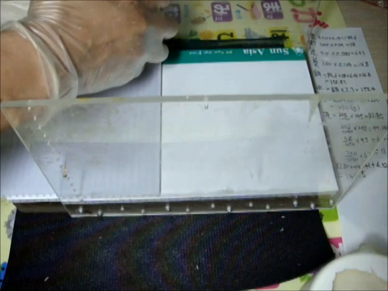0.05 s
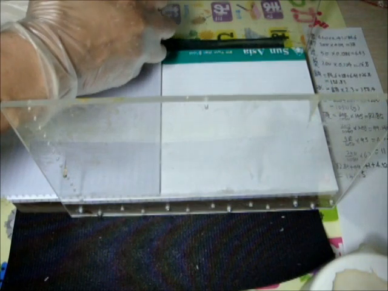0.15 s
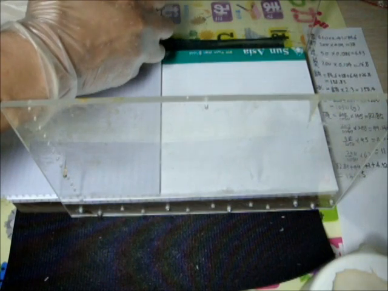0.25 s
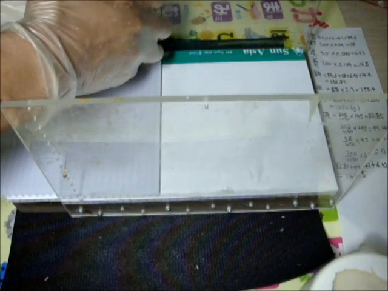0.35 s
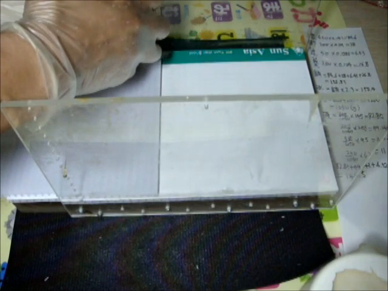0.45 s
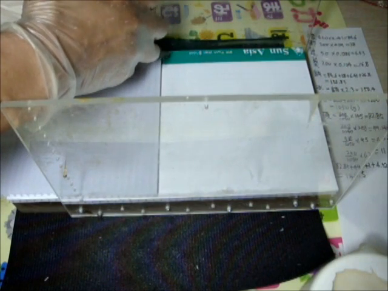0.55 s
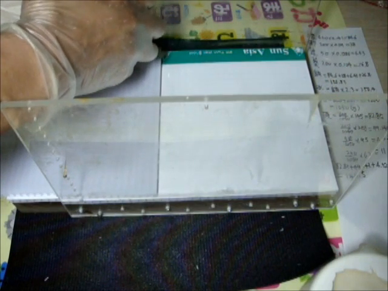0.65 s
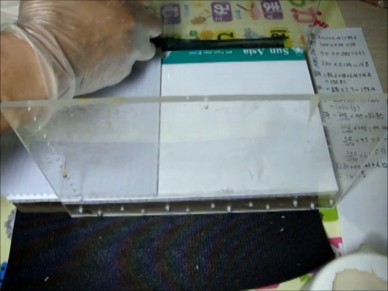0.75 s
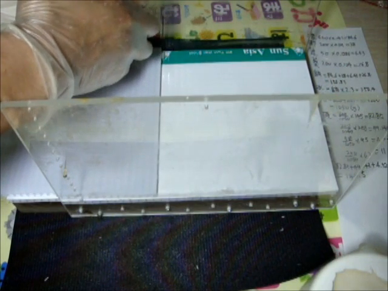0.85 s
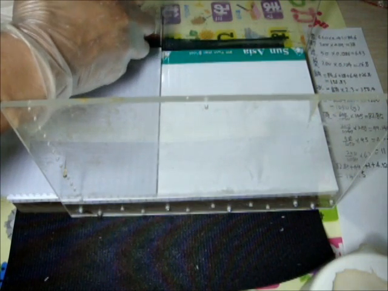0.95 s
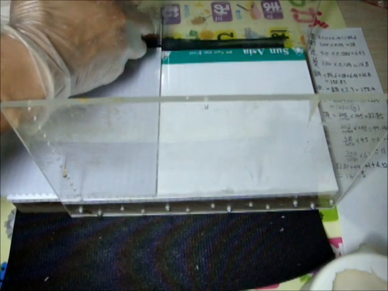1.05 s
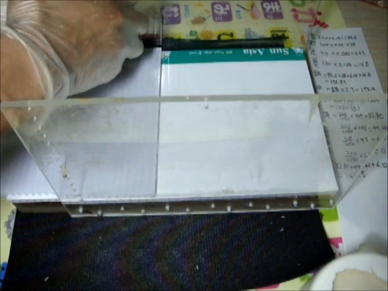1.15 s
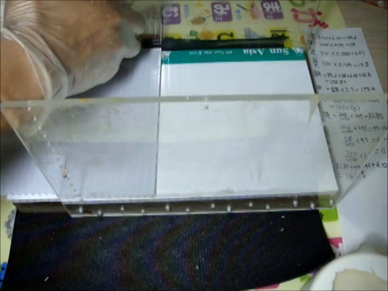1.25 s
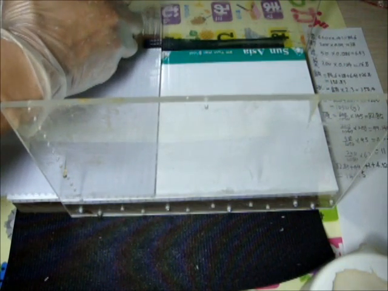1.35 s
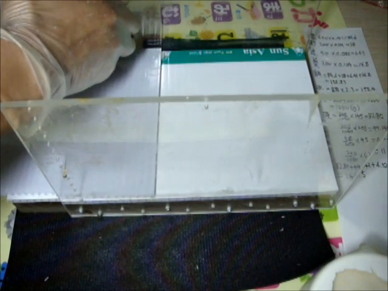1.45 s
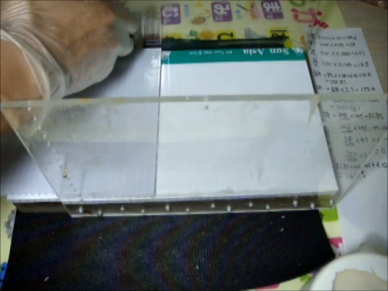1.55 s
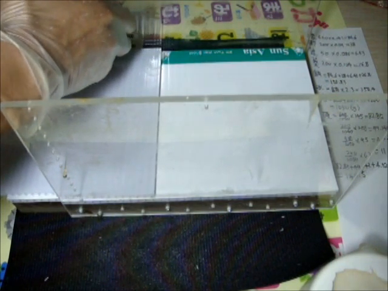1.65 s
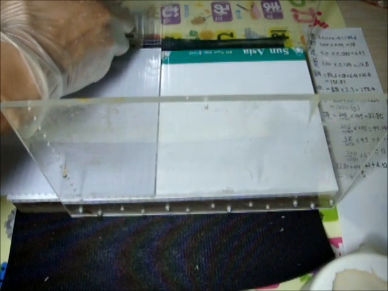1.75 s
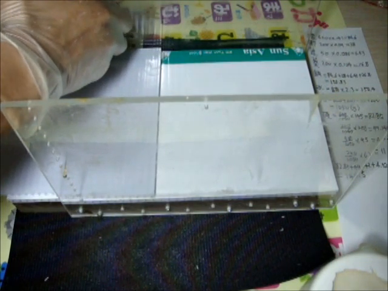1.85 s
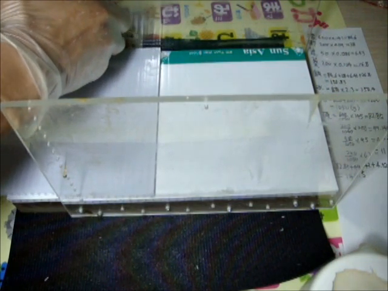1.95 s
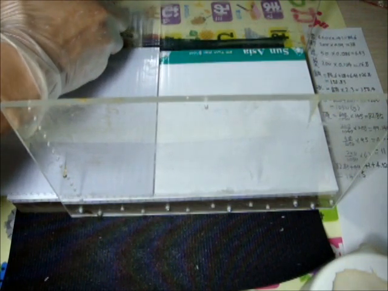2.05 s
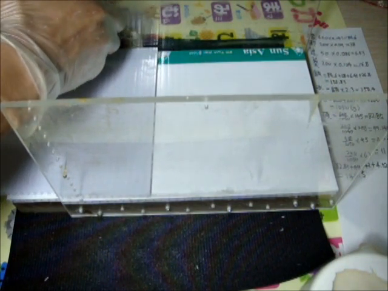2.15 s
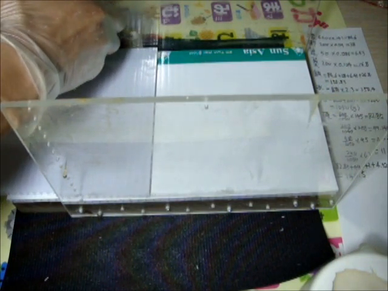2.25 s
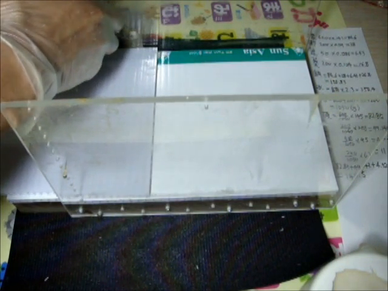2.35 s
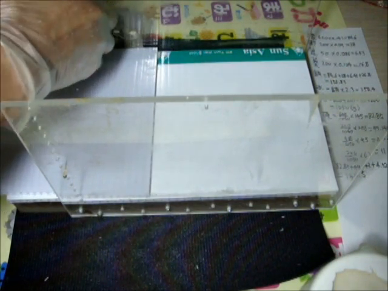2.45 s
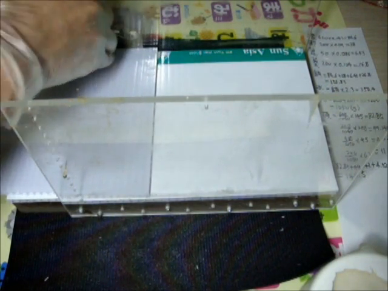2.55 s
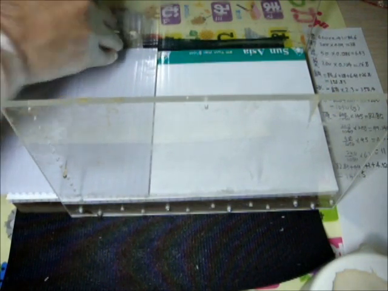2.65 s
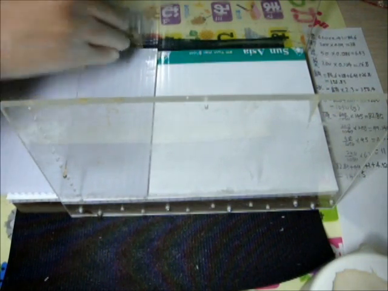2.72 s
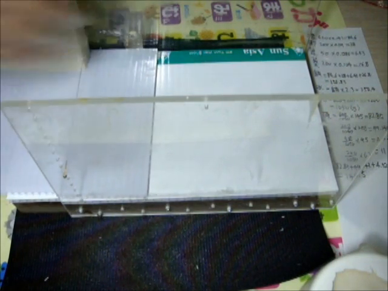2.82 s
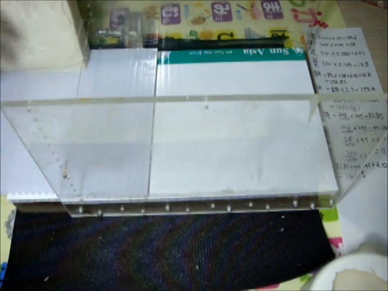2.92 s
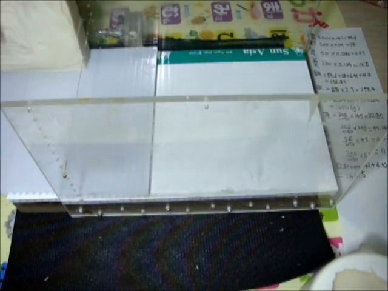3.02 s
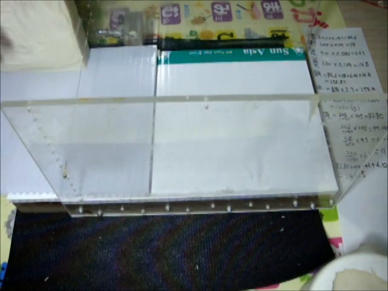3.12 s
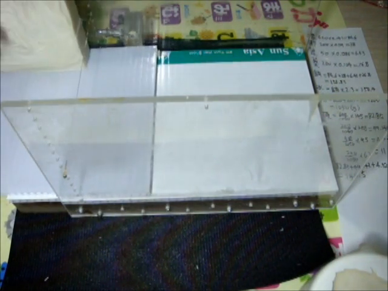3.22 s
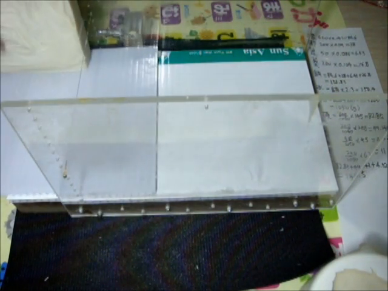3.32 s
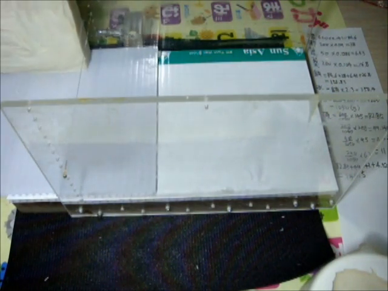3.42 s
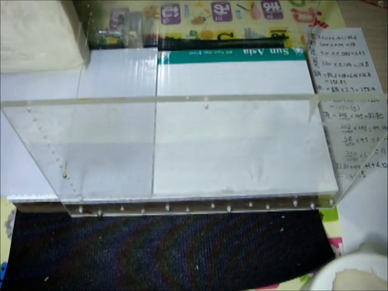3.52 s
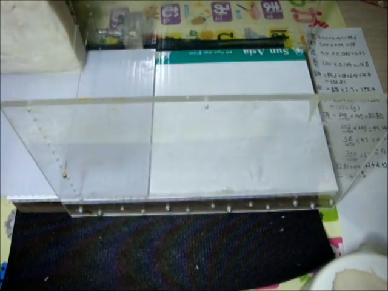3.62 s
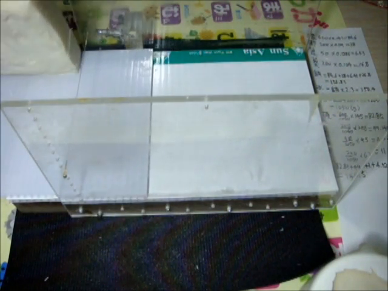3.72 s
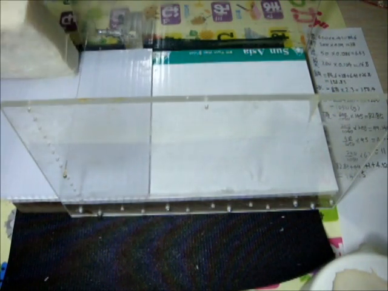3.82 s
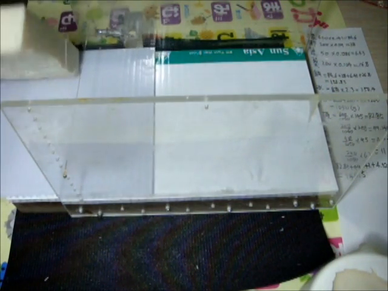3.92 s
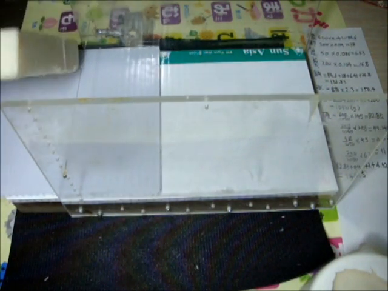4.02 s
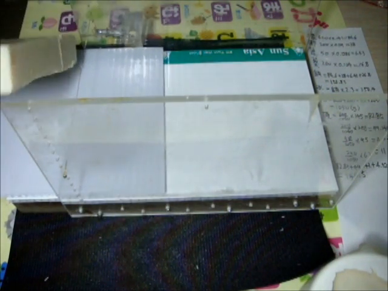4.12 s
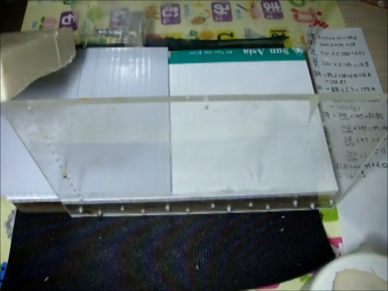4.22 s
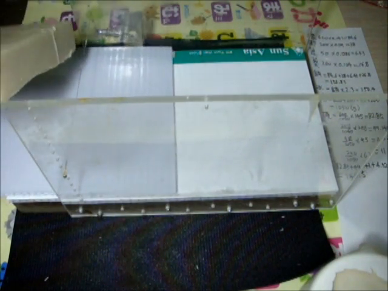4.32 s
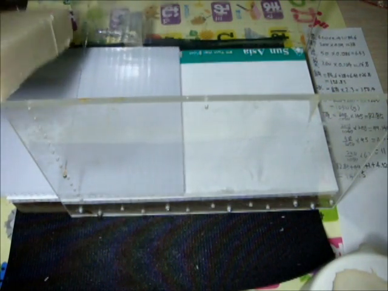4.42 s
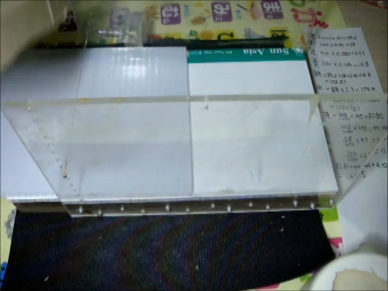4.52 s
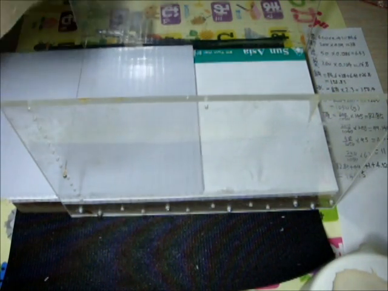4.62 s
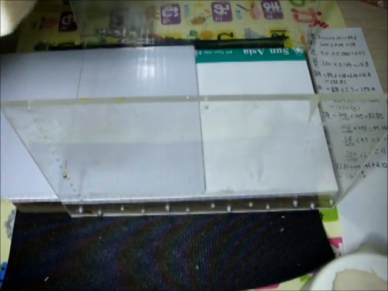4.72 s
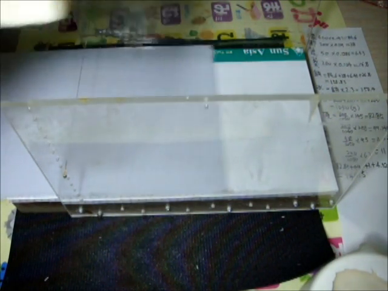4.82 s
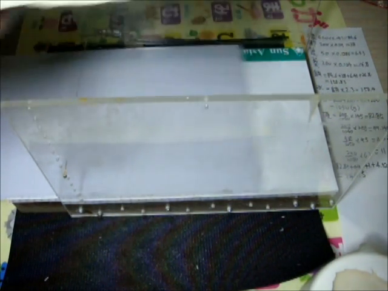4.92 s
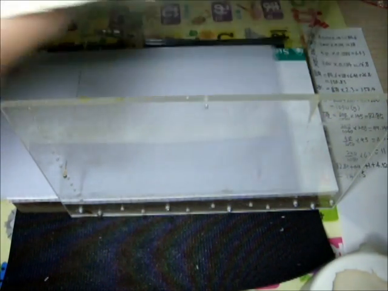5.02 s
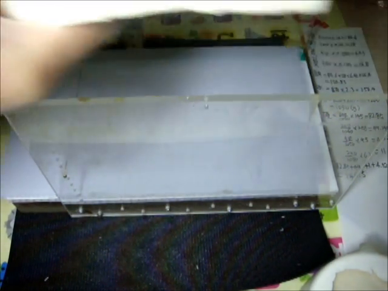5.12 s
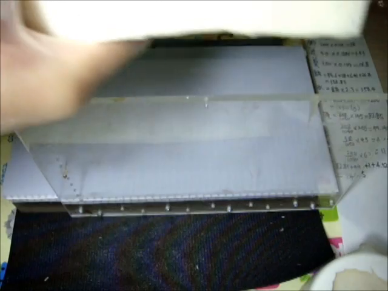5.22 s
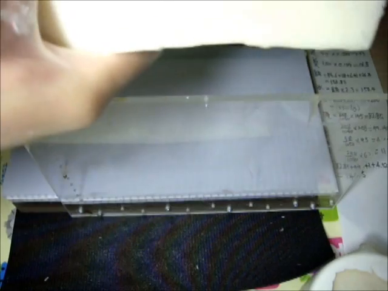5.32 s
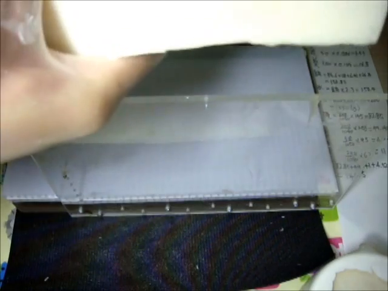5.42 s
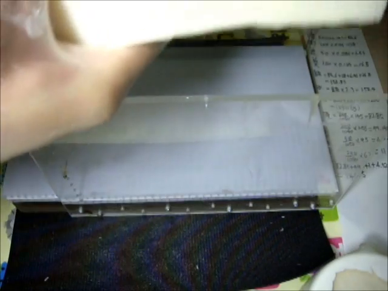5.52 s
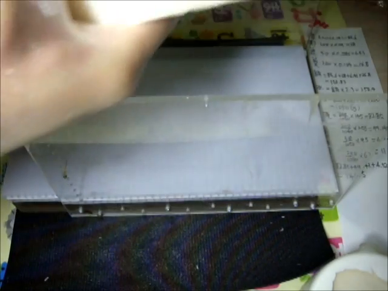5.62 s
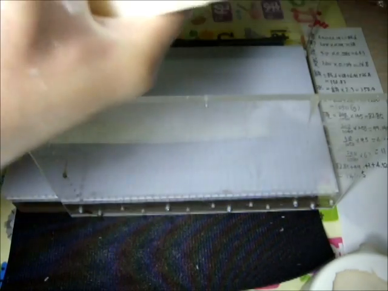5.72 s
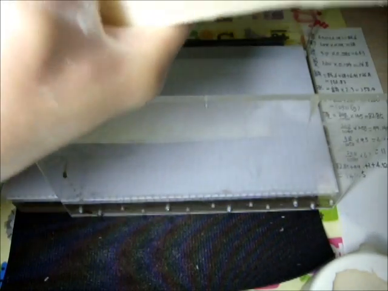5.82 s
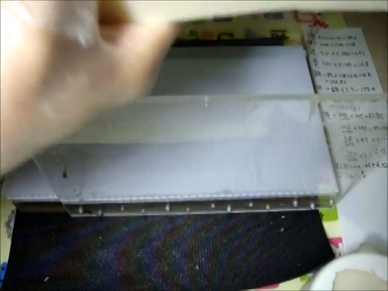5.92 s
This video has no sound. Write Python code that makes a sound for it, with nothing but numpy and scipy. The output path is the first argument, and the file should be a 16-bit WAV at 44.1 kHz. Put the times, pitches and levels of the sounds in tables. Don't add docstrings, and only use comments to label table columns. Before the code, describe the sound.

Soft fan noise, small dry ticks, a hard low knock on a board, then clatters and scraping slides ending in another solid knock.

```python
import sys
import numpy as np
from scipy import signal
from scipy.io import wavfile
from scipy.ndimage import uniform_filter1d

SR = 44100
rng = np.random.default_rng(int(sys.argv[2]) if len(sys.argv) > 2 else 0)


def unload_wav(signal):
    wavfile.write(
        sys.argv[1],
        SR,
        np.round(np.clip(np.atleast_2d(signal).T, -1, 1) * 32767).astype(np.int16),
    )


def how_loud(loudness_db):
    steps = np.asarray(loudness_db, float) / 20
    return 10 ** steps


N = 263277

# (frequency [Hz], spectral level [dB])
FAN_SPECTRUM = [(15, -55), (25, -44), (53, -17), (97, -12), (172, -5.5), (283, -3.5), (321, -4.5),
                (402, -1.5), (434, -6.5), (504, -1), (810, -6.5), (1270, -10.5), (7710, -23), (8740, -21),
                (9900, -24), (12900, -42.5), (21800, -120)]
FAN_DB = -47.5
# (frequency [Hz], bandwidth [Hz], level [dB])
FAN_LINES = [
    (57.8, 5, -71.5),
    (123.2, 3.6, -68),
    (178.3, 5.9, -63.5),
    (8670, 55, -71.5),
]
# (frequency [Hz], decay time T60 [s])
ROOM_DECAY = [(300, 0.43), (600, 0.56), (1200, 0.52), (3000, 0.49), (8000, 0.41)]
# (resonance [Hz], bandwidth [Hz], level [dB])
FLUTE_MODES = [(1200, 300, 2), (2200, 440, -2), (3330, 420, -2), (4650, 600, 0), (5600, 560, -4),
               (6600, 660, -3), (7800, 660, -7), (9250, 660, -6)]
# (frequency [Hz], level [dB], decay time T60 [s])
TABLE_MODES = [(366, -4, 0.064), (397, 11.5, 0.17), (443, -17.5, 0.065), (427, -29, 0.25), (514, -15, 0.29),
               (557, -29, 0.11), (628, 15, 0.053), (705, 14.5, 0.11), (756, -19.5, .12), (1040, -2, 0.076),
               (1290, -13, 0.12), (2060, 6, 0.12)]
# (start [s], length [s], push at start [dB], push at end [dB], brightness [dB])
SLIDES = [(2.497, 0.027, -50, -47, 2.5), (2.757, 0.042, -59.5, -56.5, 6.5), (3.307, 0.043, -46.5, -63, -18),
          (3.5, 0.013, -37.5, -45.5, -3.5), (3.517, 0.08, -40.5, -50.5, -12),
          (3.624, 0.045, -44.5, -53, -6.5), (4.25, .05, -64, -50, -4), (4.387, 0.13, -50, -48, -13.5),
          (4.576, 0.075, -55.5, -52.5, -8), (4.648, 0.034, -40, -36.5, -11.5),
          (4.68, 0.041, -40.5, -46.5, -6.5), (4.722, 0.042, -45, -54, -8), (4.844, 0.017, -37, -42, -6.5),
          (4.864, 0.023, -44.5, -45, -12), (4.892, .086, -39, -34.5, -1), (4.971, 0.046, -39, -34, 4),
          (5.011, 0.042, -39.5, -35, -4), (5.053, 0.12, -56, -51.5, 2), (5.196, 0.065, -46.5, -55, -2.5),
          (5.852, 0.12, -58, -56, 0.5)]
# (time [s], level [dB], centre [Hz], upward reach [factor])
TICKS = [(0.3431, -34.5, 2340, 1.4), (1.4087, -37, 2720, 1.1), (1.869, -38.5, 2460, 0.89),
         (2.426, -35, 2520, 1.8), (2.7654, -32, 3320, 1.15), (2.9103, -36.5, 3220, 6.6),
         (3.054, -34.5, 2400, 4.6), (3.1638, -38, 2380, 1.15), (3.2297, -35.5, 2610, 1.1),
         (3.3084, -29.5, 2390, 1.5), (3.4255, -31, 2580, 1.26), (3.456, -40, 2610, 2.8),
         (3.8267, -36.5, 2780, 1.7), (4.0287, -32, 2350, 3.8), (4.097, -31, 5200, 1.9),
         (4.58, -53, 2370, 1.7), (4.6683, -40, 3500, 3.5), (5.69, -37, 4030, 2.05), (5.896, -33, 2810, 1.3),
         (5.933, -31, 3970, 1.8)]
# (time [s], level [dB], thud pitch [Hz])
THUDS = [(2.203, -9.5, 542), (2.2072, -20.5, 380), (2.2075, -20, 750), (2.506, -43, 590),
         (2.53, -34.5, 370), (3.304, -41, 557), (3.366, -31.5, 437), (3.512, -31, 485), (3.526, -27, 516),
         (3.533, -22, 490), (3.533, -23.5, 290), (3.6191, -22, 313), (3.6212, -26.5, 510),
         (4.198, -25.5, 455), (4.2, -28.5, 705), (4.227, -27, 508), (4.737, -42, 366), (4.805, -40, 590),
         (4.864, -48, 418), (4.892, -27, 408), (4.914, -27.5, 430), (5.179, -15, 541), (5.191, -28.5, 517),
         (5.203, -26.5, 531), (5.232, -36, 552)]
# (time [s], clack level [dB], clack pitch [Hz], tick level [dB])
CLACKS = [(0.3416, -54, 2370, -33.5), (2.203, -16.5, 1040, -46.5), (2.2065, -24, 2060, -38),
          (2.2067, -30.5, 1265, -55), (2.504, -35, 2190, -46), (2.53, -28.5, 1215, -44),
          (2.777, -41.5, 917, -39), (3.305, -32, 1670, -56), (3.365, -40, 1270, -46),
          (3.4865, -43, 1600, -50), (3.502, -39, 2700, -44), (3.5113, -18, 2417, -25.5),
          (3.526, -29, 1340, -41), (3.532, -21.5, 1573, -32.5), (3.621, -25, 1220, -38.5),
          (3.623, -29, 2370, -45), (3.624, -29.5, 3440, -44), (4.198, -26.5, 1194, -41),
          (4.2, -32.5, 3070, -47), (4.227, -27, 2240, -43), (4.691, -27.5, 2190, -47),
          (4.837, -27.5, 2360, -28), (4.865, -43, 2220, -36), (4.897, -31, 1210, -26.5),
          (4.9375, -40, 2120, -23), (5.0375, -36, 3220, -30.5), (5.18, -27.5, 1090, -29.5),
          (5.192, -29, 1290, -47), (5.203, -34, 1290, -35.5), (5.23, -35, 1290, -38.5)]
# (frequency [Hz], step relative to the frame peak [dB])
CAMERA_STEPS = [(250, -54), (750, -38), (1250, -25), (2250, -15), (4250, -11), (5250, -4), (9750, -4)]


def evened(x):
    return x / np.sqrt(np.mean(x ** 2) + 1e-20)


def read(points, hz):
    f, value = np.transpose(points)
    return np.interp(np.log(hz + 1), np.log(f + 1), value)


def add(mix, s, sound):
    part = mix[round(s * SR):][:len(sound)]
    part += sound[:len(part)]


def resonate(x, hz, width):
    r = np.exp(-np.pi * width / SR)
    pole = r * np.exp(2j * np.pi * hz / SR)
    return 2 * signal.lfilter([1 - r], [1, -pole], x).real


def band(x, lo_hz, hi_hz):
    sos = signal.butter(2, [lo_hz, min(hi_hz, SR / 2.2)], "band", fs=SR, output="sos")
    return signal.sosfilt(sos, x)


def burst(rise_s, fall_s, size=1500):
    t = np.arange(size) / SR
    shape = (1 - np.exp(-t / rise_s)) ** 2 * np.exp(-t / fall_s)
    return shape / shape.max()


def fan_wash():
    frames, hz = N // 256 + 5, np.fft.rfftfreq(1024, 1 / SR)
    real, imag, patches = rng.standard_normal((frames, 513, 3)).T
    patches = uniform_filter1d(patches, size=10, axis=0)
    patches = evened(uniform_filter1d(patches, size=12, axis=1))
    spectrum = (real + 1j * imag) * how_loud(read(FAN_SPECTRUM, hz)[:, None] + 0.56 * patches)
    air = evened(signal.istft(spectrum, nperseg=1024, noverlap=768)[1][:N])
    out = how_loud(FAN_DB) * air
    stir = rng.standard_normal(N)
    for hz, width, db in FAN_LINES:
        out += how_loud(db) * evened(resonate(resonate(stir, hz, width), hz, width))
    return out


def room(x):
    taps = np.zeros(SR // 2)
    at = np.arange(300, SR // 2 - 20, 20)
    taps[at + rng.integers(0, 20, len(at))] = rng.choice([-1., 1.], len(at))
    hz, t, z = signal.stft(taps, SR, nperseg=256)
    decay = how_loud(-60 * t / read(ROOM_DECAY, hz)[:, None])
    tail = signal.istft(z * decay, SR, nperseg=256)[1]
    return signal.fftconvolve(x, tail / np.linalg.norm(tail))[:N]


def flutes(x, through_db):
    out = how_loud(through_db) * x
    for hz, width, db in FLUTE_MODES:
        out = out + how_loud(db) * resonate(resonate(x, hz, width), hz, width)
    return out


def ticks():
    out = np.zeros(N)
    for (s, db, hz, reach), grit in zip(TICKS, rng.standard_normal((len(TICKS), 1500))):
        puff = burst(0.0001, 0.0024) * grit
        spike = 3.9 * burst(0.00002, 0.00003)
        snap = band(puff + spike, 0.7 * hz, max(reach, 1.2) * hz)
        add(out, s, how_loud(db - 1.5) * snap / abs(snap).max())
    return out


def slides():
    grip_s, let_go_s, rumble_db = 0.0042, 0.008, -6.5
    slips = rng.standard_normal(N) * how_loud(2.1 * rng.exponential(1, N))
    chatter = evened(band(rng.standard_normal(N), 20, 130))
    hiss = how_loud(-11) * np.roll(slips, N // 3)
    shaken = how_loud(2.0 * chatter) * (flutes(slips, -20) + hiss)
    low = evened(band(shaken, 750, 3200))
    high = -evened(band(shaken, 4700, 15000))
    rumble = evened(band(slips, 300, 750))
    out = np.zeros(N)
    for s, length, start_db, end_db, bright_db in SLIDES:
        t = np.arange(0, length, 1 / SR)
        at = np.minimum(round(s * SR) + np.arange(len(t)), N - 1)
        hold = np.clip(np.minimum(t / grip_s, (length - t) / let_go_s), 0, 1)
        push = how_loud(start_db + (end_db - start_db) * t / length) * hold
        add(out, s, push * (low[at] + how_loud(bright_db) * high[at] + how_loud(rumble_db) * rumble[at]))
    return out


def blows():
    thud, clack, shake, tick = np.zeros((4, N))
    t = np.arange(1500) / SR
    for s, thud_db, hz in THUDS:
        add(thud, s, how_loud(thud_db) * burst(0.004, 0.0022) * np.sin(2 * np.pi * hz * t))
    grits = rng.standard_normal((len(CLACKS), 3, 1500))
    for (s, clack_db, clack_hz, tick_db), grit in zip(CLACKS, grits):
        strike = grit[0] + 0.2 * np.sin(2 * np.pi * clack_hz * t)
        knock = resonate(burst(0.00051, 0.0041) * strike, clack_hz, 0.19 * clack_hz)
        add(clack, s, how_loud(clack_db - 1.0) * knock / abs(knock).max())
        jolt = burst(0.00011, 0.0023) * evened(band(grit[2], 980, 3600))
        add(shake, s, how_loud((clack_db + tick_db) / 2 - 2.0) * jolt)
        edge = burst(0.00074, 0.0019) * evened(band(grit[1], 3400, 12000))
        add(tick, s, how_loud(tick_db - 2.0) * edge)
    force = thud + how_loud(5.0) * (clack + shake)
    ring = np.zeros(N)
    for hz, db, t60 in TABLE_MODES:
        width = np.log(1000) / np.pi / t60
        ring += how_loud(db) * resonate(force, hz, width) * t60
    body = band(thud + how_loud(10.5) * ring, 87, 20000)
    return body + clack + flutes(shake, -1.2) + flutes(tick, -1.5)


def scene():
    near = blows() + ticks() + slides()
    return (near + how_loud(-10.0) * room(near) + fan_wash())[None]


def camera_subbands(x):
    n, hz, k = np.arange(512) - 255.5, np.arange(0, 500, 5), np.arange(20)[:, None]
    shape = np.cos(np.pi / 2 * np.sin(np.pi * hz / 1000) ** 2) * np.where(hz, 1, 0.5)
    bank = shape @ np.cos(2 * np.pi * np.outer(hz, n) / 32000)
    bank = bank * np.cos((2 * k + 1) * np.pi * n / 64 + (-1) ** k * np.pi / 4)
    bank /= np.linalg.norm(bank, axis=1, keepdims=True)
    lead, frames = 256 + 11 * 32, 168
    slow = np.pad(signal.resample_poly(x, 320, 441), (lead, 4096))
    blocks = np.lib.stride_tricks.sliding_window_view(slow, 512)[::32][:36 * frames]
    bands = (blocks @ bank.T).reshape(frames, 36, 20)
    peak = abs(bands).max(axis=1, keepdims=True)
    step = peak * how_loud(read(CAMERA_STEPS, 500 * k.T + 250)) + 1e-12
    parts = (step * np.round(bands / step)).reshape(-1, 20) @ bank
    out = np.zeros(len(slow))
    for i in range(16):
        add(out, 32 * i / SR, parts[:, 32 * i:32 * i + 32].ravel())
    return signal.resample_poly(out[lead:], 441, 320)[:N]


def top_cut(x):
    return signal.sosfilt(signal.butter(12, 11140, fs=SR, output="sos"), x)


def record(dry):
    mix = camera_subbands(dry[0])[None]
    return top_cut(mix)


dry = scene()
out = record(dry)
unload_wav(out)
```